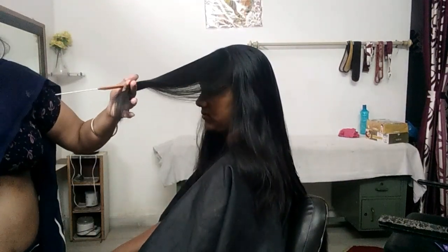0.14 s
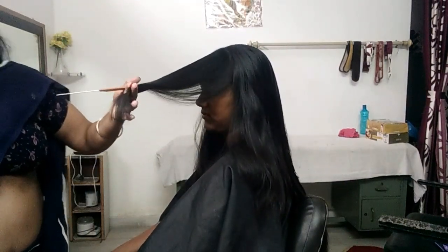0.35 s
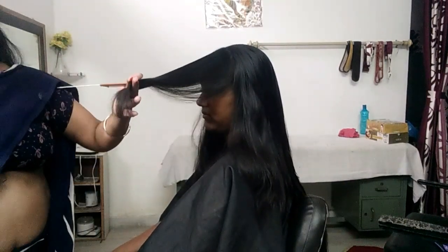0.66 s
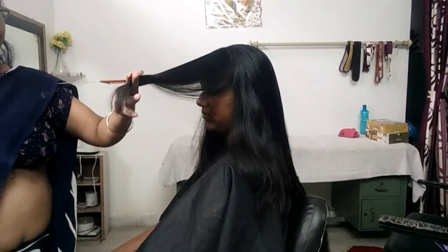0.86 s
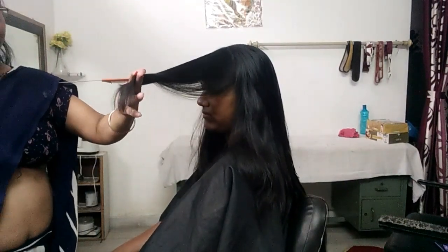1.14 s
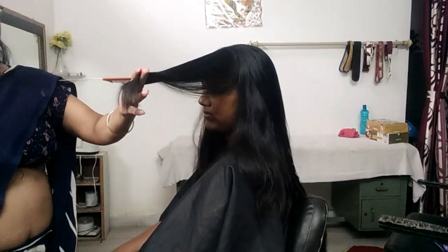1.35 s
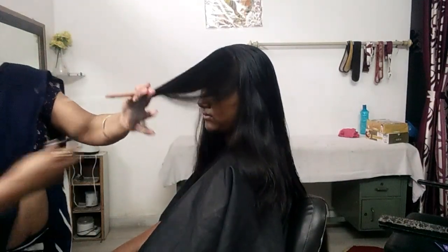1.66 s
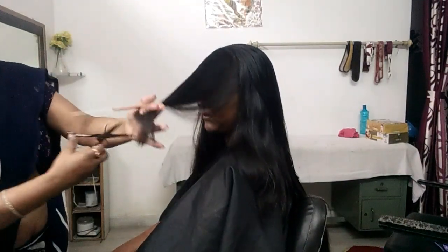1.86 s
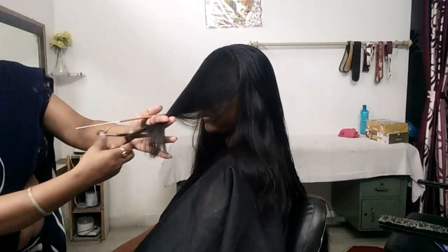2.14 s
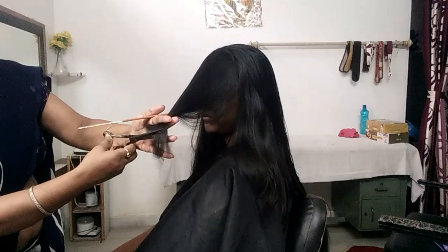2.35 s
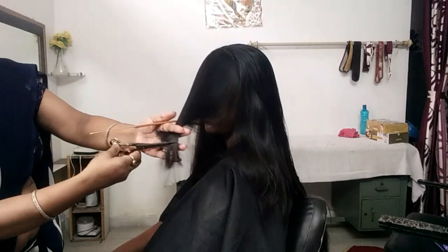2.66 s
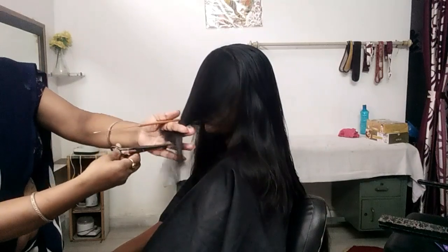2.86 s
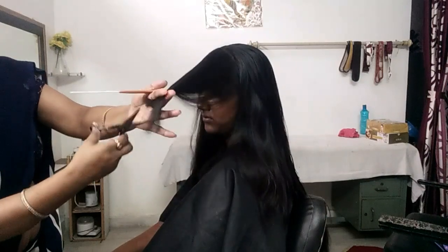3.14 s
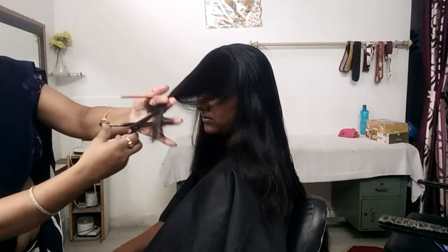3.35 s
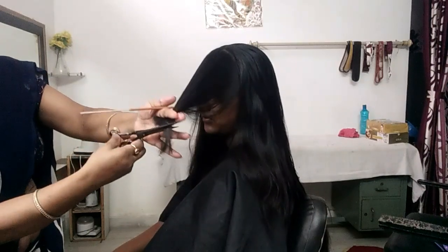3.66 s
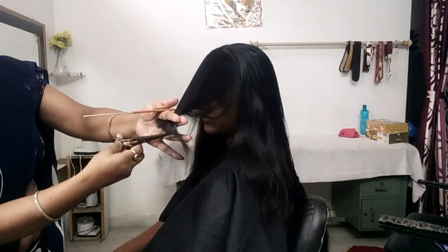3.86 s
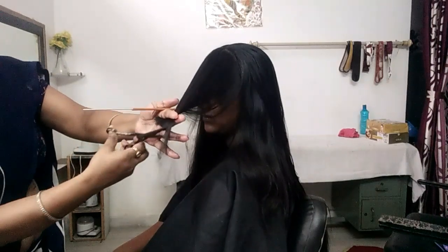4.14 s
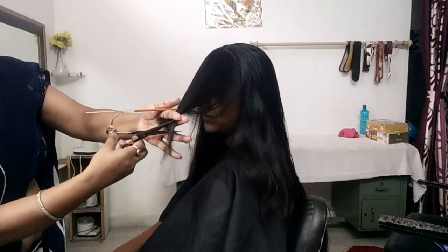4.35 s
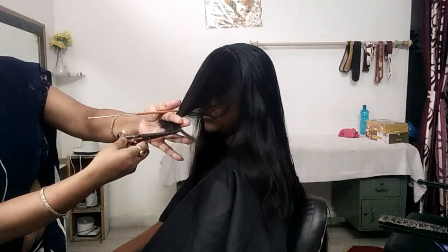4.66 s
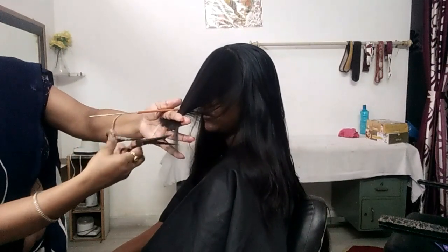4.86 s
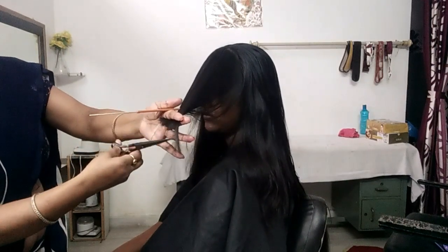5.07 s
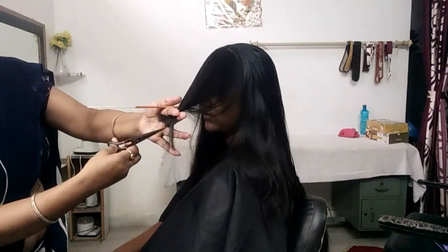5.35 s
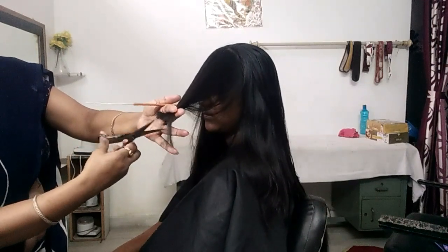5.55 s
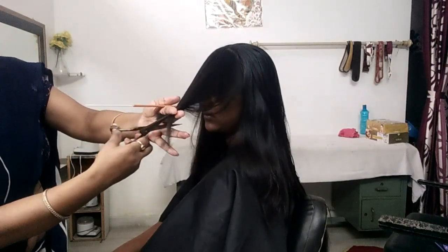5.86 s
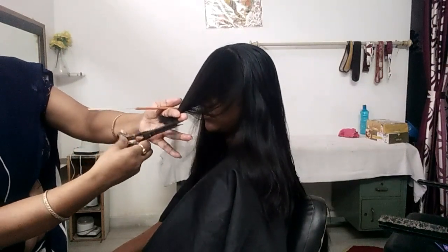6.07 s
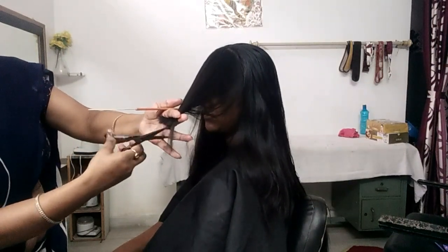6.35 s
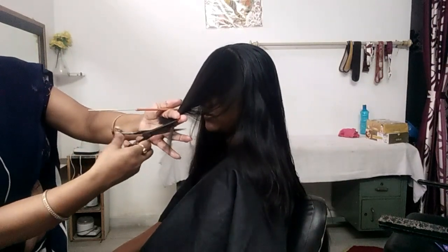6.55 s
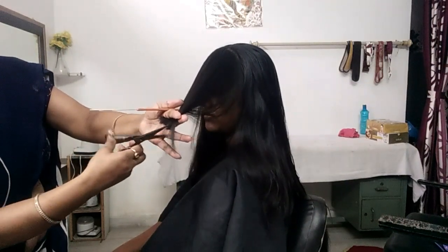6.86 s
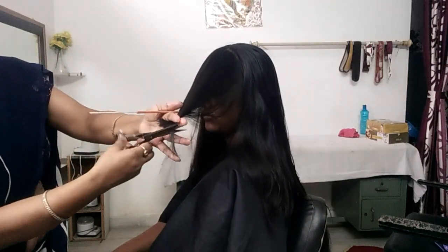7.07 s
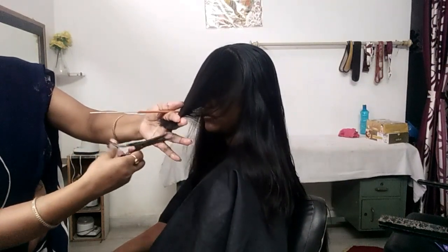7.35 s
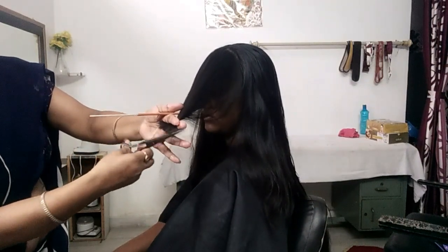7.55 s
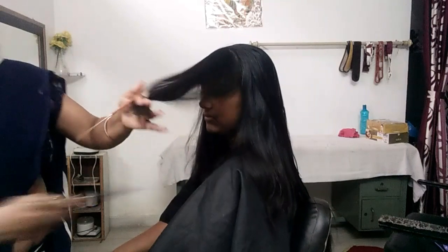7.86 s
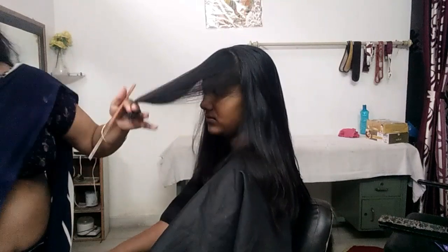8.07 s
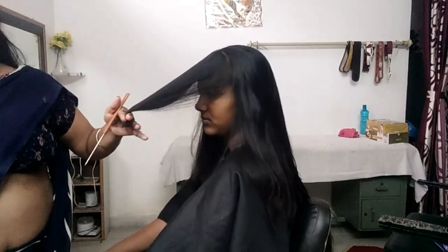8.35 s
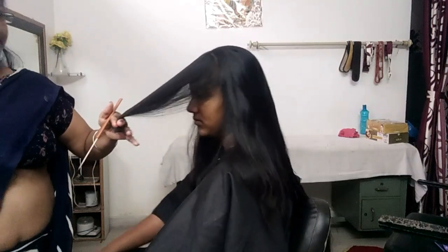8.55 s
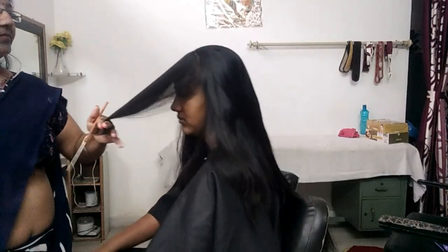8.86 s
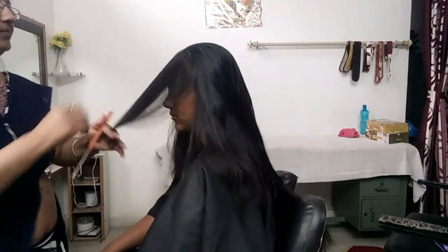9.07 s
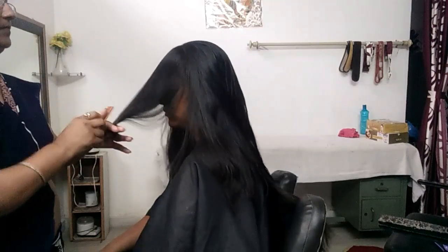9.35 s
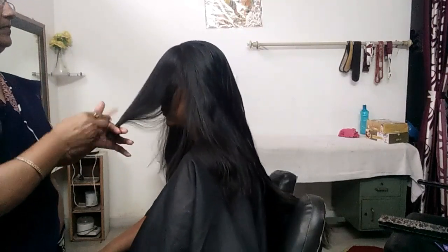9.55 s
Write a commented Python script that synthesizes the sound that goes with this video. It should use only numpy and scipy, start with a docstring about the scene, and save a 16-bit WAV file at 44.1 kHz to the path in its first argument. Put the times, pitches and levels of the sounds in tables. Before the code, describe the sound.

Steel scissors click and clatter brightly onto a shelf in a small, hard-walled room. After a pause they snip through a lock of hair about seven times, each crisp crunch ending in a metallic click. Bangles clink, a comb swishes, and the scissors clatter down again. Hair rustles softly near the microphone, with the shelf a little farther off and muffled street noise and a faint hum underneath.

```python
"""Haircut in a small hard-walled room

A dull knock dies away; steel scissors clatter down on a shelf and are picked up, bite again and again
through a held lock, ticking as the blades meet and part, and are put down again. Hair rustles under
the fingers, bangles clink, a comb swishes; dull street noise and a faint hum lie underneath."""
import sys
import numpy as np
from scipy import signal
from scipy.fft import rfft, irfft, next_fast_len
from scipy.io import wavfile
from scipy.ndimage import map_coordinates

SR = 44100
rng = np.random.default_rng(int(sys.argv[2]) if len(sys.argv) > 2 else 0)


def persist_wave(psi):
    """Save psi, clipped to +-1, as 16-bit WAV."""
    counts = np.round(np.clip(psi, -1, 1) * 32767).astype(np.int16)
    wavfile.write(sys.argv[1], SR, np.atleast_2d(counts).T)


N = 428211
TIME = np.arange(N) / SR


def from_db(db):
    """Decibels to gain."""
    return 10 ** (np.asarray(db) / 20)


def unit_rms(x):
    """Scale to unit power."""
    return x / np.sqrt(np.mean(x ** 2) + 1e-20)


def at_hz(points, hz):
    """Read a curve on a log-frequency axis."""
    f, value = np.transpose(points)
    return np.interp(np.log(np.maximum(hz, 1)), np.log(f), value)


def colour(x, curve):
    """Broad EQ that keeps the power of white noise."""
    size = next_fast_len(N + 4096)
    gain = unit_rms(from_db(at_hz(curve, np.arange(size // 2 + 1) * SR / size)))
    return irfft(rfft(x, size) * gain, size)[:N]


def bandpass(x, low_hz, high_hz):
    """One band with gentle slopes."""
    return signal.sosfilt(signal.butter(2, [low_hz, high_hz], "band", fs=SR, output="sos"), x)


def resonate(x, modes):
    """Parallel resonators; each mode's level sets its share of the power."""
    out, total = 0, 0
    for k, (hz, width, db) in enumerate(modes):
        r = np.exp(-np.pi * width / SR)
        band = signal.lfilter([1, 0, -1], [1, -2 * r * np.cos(2 * np.pi * hz / SR), r * r], x + 1e-18)
        out = out + (-1) ** k * from_db(db) * np.sqrt((1 - r * r) / 2) * band
        total += from_db(db) ** 2
    return out / np.sqrt(total)


def drift(rate_hz):
    """Smooth random modulation of spread 1."""
    hop, settle = 40, 2000
    r = np.exp(-2 * np.pi * rate_hz * hop / SR)
    slow = signal.lfilter([1], [1, -2 * r, r * r], rng.standard_normal(N // hop + settle + 2))[settle:]
    return np.interp(np.arange(N) / hop, np.arange(len(slow)), unit_rms(slow))


def grains(per_s, spread_db):
    """Tiny slips and snaps at random moments; unit power."""
    sizes = from_db(spread_db * np.minimum(rng.exponential(1, N), 4)) * rng.choice([-1, 1], N)
    return unit_rms(sizes * (rng.random(N) < per_s / SR))


def bursts(times, levels_db, t60s, rise_s):
    """Force envelope of contacts that strike and die away."""
    power = np.zeros(N)
    for s, db, t60 in zip(times, levels_db, t60s):
        start = max(int(s * SR), 0)
        age = TIME[:min(SR // 2, N - start)]
        envelope = from_db(db - 60 * age / t60) * (1 - np.exp(-age / rise_s))
        power[start:start + len(age)] += envelope ** 2
    return np.sqrt(power)


def blows(s, db, t60, rise_s, rattle_db=-9, rattle_t60_s=0.17):
    """Force envelope of sharp blows, each trailed by a weaker rattle."""
    rattle = bursts(s, db + rattle_db, np.full(len(s), rattle_t60_s), rise_s=0.005)
    return np.hypot(bursts(s, db, t60, rise_s), rattle)


def touch(cues, modes, t60_s):
    """Brief metal contacts set a body ringing."""
    s, db = np.transpose(cues)
    force = bursts(s, db, np.full(len(s), t60_s), rise_s=0.00051) * rng.standard_normal(N)
    return resonate(force, modes)


# fader ride of the street bed: (time [s], level [dB])
STREET_RIDE = [(1.1, -53.5), (2.62, -55), (3.7, -50), (5.63, -49), (6.41, -47.5), (8.26, -48.5),
               (8.4, -51.5), (9.1, -53.5)]
# the street, muffled by the walls: (frequency [Hz], gain [dB])
STREET_EQ = [(25, -23), (100, -19), (250, -5), (380, -16), (520, -9.5), (700, -5), (900, -2), (1400, -4.5),
             (1900, -9), (2500, -18), (3300, -26.5), (7000, -40)]
# standing waves of the room: (frequency [Hz], width [Hz], level [dB])
STANDING_WAVES = [(54, 7.1, -11), (113.9, 9.8, -12), (171.7, 18, -9), (288.4, 12.5, -3.5),
                  (325.5, 15.6, -4), (430.2, 26, -2), (469.6, 20, -0.5), (589, 37, -1), (779, 48, -2)]
def street(wash_db=-3.5, standing_db=-2, burble_db=3.8):
    """Far street noise burbles band by band and stirs the room's standing waves."""
    edges = np.geomspace(250, 3200, 17)
    white, burble = rng.standard_normal((2, N)), 0
    for k, (low, high) in enumerate(zip(edges, edges[1:])):
        burble = burble + bandpass(white[k % 2], low, high) * from_db(burble_db * drift(16))
    wash = unit_rms(colour(burble + 0.57 * rng.standard_normal(N), STREET_EQ))
    standing = resonate(rng.standard_normal(N), STANDING_WAVES)
    standing = signal.sosfilt(signal.butter(3, 1100, fs=SR, output="sos"), standing)
    standing = unit_rms(standing * from_db(3.05 * drift(17)))
    fader = from_db(np.interp(TIME, *np.transpose(STREET_RIDE)) + 0.7 * drift(5))
    return fader * (from_db(wash_db) * wash + from_db(standing_db) * standing)


# swells of the hum: (time [s], level [dB])
SWELL_CUES = [(4.6, -58), (6.17, -62), (7.33, -62), (7.9, -64)]
def hum(hz=104.55, width_hz=4, floor_db=-73.5, half_swell_s=0.15):
    """A faint, wavering motor hum of narrow-band noise, with bell-shaped swells."""
    motor = [(hz, width_hz, 0)]
    tone = unit_rms(resonate(resonate(rng.standard_normal(N), motor), motor))
    swells = sum(from_db(db) * np.exp(-((TIME - s) / half_swell_s) ** 2) for s, db in SWELL_CUES)
    return (from_db(floor_db) + swells) * tone


# fingers shift their grip on the lock: (time [s], length [s], level [dB])
GRIP_CUES = [(0, 0.25, -44.5), (0.25, 0.26, -51), (1.1, 0.32, -54.5), (1.5, 0.096, -66),
             (1.66, 0.14, -69.5), (1.86, 0.46, -67.5), (2.303, 0.19, -60), (2.499, 0.21, -58.5),
             (2.74, .26, -64.5), (3.408, 0.3, -63), (3.63, 0.11, -60), (5.327, 0.31, -55),
             (5.636, .14, -53), (5.872, 0.18, -61), (6.132, 0.19, -58), (6.61, 0.32, -63),
             (7.215, 0.17, -61.5), (7.668, .23, -64.5), (8.183, 0.41, -56), (8.588, 0.21, -47.5),
             (9.098, 0.34, -53.5), (9.478, 0.23, -45.5)]
# blades click apart and slide open: (time [s], click level [dB], slide length [s], slide level [dB])
OPEN_CUES = [(3.135, -37, 0.16, -54), (4.132, -40.5, 0.62, -58), (4.975, -42, 0.54, -53.5),
             (6.456, -34.5, 0.16, -52.5), (6.992, -36.5, 0.18, -53), (7.500, -52.5, .09, -49),
             (7.880, -46, 0.34, -61)]
# airy sheen of sliding hair: (frequency [Hz], gain [dB])
HAIR_EQ = [(1000, -14), (3500, -13), (6000, -12), (8200, 0), (10000, -4.5), (12000, -8.5), (14100, -13.5),
           (14500, -17), (16000, -28)]
def hair_rustle(rustle_db=-2.5, hiss_db=-72, attack_s=0.019, release_s=0.057, sag_db=11, waver_db=3.4):
    """Strands crackle over fingers and opening blades above a faint hiss; each rub catches and eases."""
    slides = [(s, length, db) for s, _, length, db in OPEN_CUES]
    friction = np.zeros(N)
    for s, length, db in GRIP_CUES + slides:
        at = np.arange(max(int(s * SR), 0), min(int((s + length) * SR), N))
        age = TIME[at] - s
        fades = np.clip(np.minimum(age / attack_s, (length - age) / release_s), 0, 1)
        friction[at] += from_db(db - sag_db * age / length) * fades
    friction *= from_db(waver_db * drift(17))
    crackle = colour(grains(per_s=6000, spread_db=2.5), HAIR_EQ)
    return (from_db(rustle_db) * friction + from_db(hiss_db)) * crackle


# a dull knock dies away at the very start; then the scissors land:
# (time [s], level [dB], chatter t60 [s], shelf send [dB], thud send [dB])
IMPACT_CUES = [(0.001, -37.5, 0.21, -10, 1), (0.409, -31, 0.078, -24, -18.5),
               (0.4213, -24.5, 0.093, -16.5, -12), (0.439, -26.5, 0.063, -3.5, -1.5),
               (0.4482, -8, 0.061, -15, -12.5), (0.479, -18, 0.05, -5, -7.5), (0.631, -24.5, .04, -17, -5),
               (8.8006, -26.5, 0.044, -16, -12), (8.8118, -11, 0.055, -9.5, -9.5),
               (8.836, -6.5, 0.027, -2, -11.5), (8.859, -19, 0.076, 6, -3)]
# bright ring of loose scissors: (frequency [Hz], width [Hz], level [dB])
LOOSE_STEEL_MODES = [(3720, 13, -25), (5050, 150, 1), (6040, 300, -27), (7500, 72, -22), (9030, 28, -2),
                     (8540, 250, 6), (10140, 50, -14.5), (10600, 27, -10), (12160, 35, 6.5),
                     (12140, 35, -3), (11750, 510, -11.5), (13500, 46, -7), (13700, 54, 4.5),
                     (14470, 25, -5), (15300, 200, -17.5)]
# midrange body of the shelf: (frequency [Hz], width [Hz], level [dB])
SHELF_MODES = [(571.4, 15, -5), (850, 600, -2), (1120, 140, -9.5), (1439, 33, 1), (1420, 350, -1),
               (1950, 200, -10)]
# hard edge of a steel contact: (frequency [Hz], gain [dB])
CRACK_EQ = [(300, -6.5), (1500, -4.5), (3000, -4), (5500, 0), (9000, 4), (12500, 2), (14200, -2.5),
            (14600, -10), (16000, -31)]
# weight under an impact: (frequency [Hz], gain [dB])
THUD_EQ = [(30, -34), (70, -15), (115, -19), (180, -3), (350, -3), (650, 0), (1500, 0), (2400, -6),
           (4000, -11), (9000, -30)]
def clatter(steel_db=-1, crack_db=-3, shelf_db=-2.5, thud_db=3.5):
    """A dull knock fades; then loose scissors bounce, ring and rattle as the shelf rings and thuds."""
    s, db, t60, shelf_send, thud_send = np.transpose(IMPACT_CUES)
    force = blows(s, db, t60, rise_s=0.00065) * grains(per_s=14000, spread_db=0.5)
    shelf_force = blows(s, db + shelf_send, t60, rise_s=0.0032) * rng.standard_normal(N)
    thud_force = blows(s, db + thud_send, t60, rise_s=0.0044) * rng.standard_normal(N)
    return (from_db(steel_db) * resonate(force, LOOSE_STEEL_MODES)
            + from_db(crack_db) * colour(force, CRACK_EQ)
            + from_db(shelf_db) * resonate(shelf_force, SHELF_MODES)
            + from_db(thud_db) * colour(thud_force, THUD_EQ))


# scissors click in the hand: (time [s], level [dB], chatter t60 [s], knock send [dB])
HANDLING_CUES = [(0.2352, -23.5, 0.021, -26), (0.294, -29, 0.093, -2), (0.903, -42, 0.11, -6.5),
                 (0.9794, -26, 0.078, -11.5), (1.0945, -36, .022, -18), (3.175, -43, 0.077, -24),
                 (5.007, -38, 0.018, -23), (5.193, -38, 0.046, -25), (5.367, -33.5, 0.017, -26),
                 (5.504, -39.5, 0.046, -14.5), (7.978, -40, 0.064, -26), (8.003, -30, 0.029, -28),
                 (8.5904, -35, .04, -6)]
# choked ring of held scissors: (frequency [Hz], width [Hz], level [dB])
HELD_STEEL_MODES = [(5700, 230, -14.5), (7100, 240, -17.5), (9040, 230, 1.5), (9450, 180, -15.5),
                    (9790, 390, 4), (11350, 140, 1.5), (12600, 390, 3), (13100, 400, -28), (13980, 227, -2)]
# dull knock of the handle: (frequency [Hz], width [Hz], level [dB])
HANDLE_MODES = [(820, 170, -7), (1430, 65, 1.5), (1800, 150, -2), (2590, 180, -1), (4000, 230, -25.5)]
def scissor_ticks(steel_db=-1, crack_db=-4, snip_t60_s=0.034, snip_knock_db=-25):
    """Blades and finger rings meet, in handling and twice in each snip; the hand damps their ring."""
    contacts = [(s, db) for s, _, _, db in CUT_CUES] + [(s, db) for s, db, _, _ in OPEN_CUES]
    snip_clicks = [(s, db, snip_t60_s, snip_knock_db) for s, db in contacts]
    s, db, t60, knock_send = np.transpose(HANDLING_CUES + snip_clicks)
    chatter = grains(per_s=16000, spread_db=2)
    force = bursts(s, db, t60, rise_s=0.0009) * chatter
    knock = bursts(s, db + knock_send, t60, rise_s=0.0008) * chatter
    return (from_db(steel_db) * resonate(force, HELD_STEEL_MODES)
            + from_db(crack_db) * colour(force, CRACK_EQ)
            + resonate(knock, HANDLE_MODES))


# light taps: (time [s], level [dB])
TAP_CUES = [(0.636, -30), (8.591, -33)]
# ring of a tap: (frequency [Hz], width [Hz], level [dB])
TAP_RING = [(830, 94, -5.5), (1850, 71, -0.5), (2720, 42, -9.5), (3970, 120, -7), (5760, 190, -7),
            (9600, 350, -5.5)]
def shelf_taps():
    """Steel touches the shelf lightly and rings for a moment."""
    return touch(TAP_CUES, TAP_RING, t60_s=0.094)


# blades close and click shut: (shut time [s], stroke length [s], crunch level [dB], click level [dB])
CUT_CUES = [(3.015, 0.3, -45, -35.5), (4.032, 0.25, -45.5, -40.5), (4.820, 0.17, -45.5, -22),
            (6.345, 0.11, -42, -36), (6.905, 0.15, -44, -50), (7.4, 0.11, -44, -34.5),
            (7.782, 0.044, -47, -33)]
# crisp crunch of sheared hair: (frequency [Hz], gain [dB])
CRUNCH_EQ = [(800, -6), (3500, -15.5), (5800, -12.5), (8000, -2), (10000, -1.5), (12000, -2), (14100, -10),
             (14500, -7), (16000, -31)]
# squeak of edge on edge: (frequency [Hz], width [Hz], level [dB])
SQUEAK_MODES = [(6900, 180, -7), (11450, 170, 0), (13900, 900, -9)]
def cuts(swell_db=20, release_s=0.008, flutter_db=4, squeak_db=-4.5, slip_db=5, pitch_sag=0.26):
    """Tufts snap ever harder as the blades close; the rubbing edges squeak in fits, sinking in pitch."""
    crunch = colour(grains(per_s=2200, spread_db=0), CRUNCH_EQ)
    crunch *= unit_rms(from_db(flutter_db * np.tanh(drift(70))))
    rub = resonate(rng.standard_normal(N), SQUEAK_MODES)
    rub *= unit_rms(from_db(slip_db * np.tanh(2 * drift(20))))
    judder = 0.012 * drift(25.4)
    out = np.zeros(N)
    for end, length, db, _ in CUT_CUES:
        start = end - length
        at = np.arange(int(start * SR), int(end * SR) + SR // 10)
        closed = np.clip((TIME[at] - start) / length, 0, 1)
        fades = np.minimum(10 * closed, 1) * np.exp(-np.maximum(TIME[at] - end, 0) / release_s)
        grip = from_db(db - swell_db * (1 - closed)) * fades
        pitch_ratio = 1 - pitch_sag * closed ** 2 + judder[at]
        squeak = map_coordinates(rub[at], [np.cumsum(pitch_ratio)], order=5)
        # the edges rub hardest past mid-stroke; at the tips only the crunch is left
        pressure = np.sqrt(np.abs(np.sin(np.pi * closed ** 2)))
        out[at] += grip * (crunch[at] + from_db(squeak_db) * pressure * squeak)
    return out


# bangles touch: (time [s], level [dB])
CLINK_CUES = [(7.9185, -25.5), (7.928, -28)]
# sparkle of a bangle: (frequency [Hz], width [Hz], level [dB])
BANGLE_MODES = [(3870, 220, -4.5), (5750, 270, -8), (7700, 250, 2), (9100, 330, 1), (11570, 120, 11),
                (12500, 150, -15), (13350, 200, 2), (14200, 130, -7), (15200, 200, -3)]
def bangles():
    """Metal bangles knock together in a quick double clink."""
    return touch(CLINK_CUES, BANGLE_MODES, t60_s=0.03)


# comb and fingers pull through the lock: (start [s], end [s], level [dB], rasp send [dB])
COMB_CUES = [(8.046, 8.183, -51.5, -9.5), (8.217, 8.418, -52, 1.5), (9.192, 9.373, -43.5, -11.5),
             (9.562, 9.75, -48, -5.5)]
# body of the swish: (frequency [Hz], width [Hz], level [dB])
SWISH_MODES = [(920, 420, 6.5), (1680, 180, 9), (2910, 360, 0.5)]
# rasp of the teeth: (frequency [Hz], width [Hz], level [dB])
RASP_MODES = [(4200, 1800, -0.5), (4860, 500, -0.5), (6160, 1500, -3)]
def comb():
    """Strands slip past the teeth in a raspy swish; each stroke catches and fades."""
    slips = grains(per_s=6700, spread_db=3)
    swish, rasp = resonate(slips, SWISH_MODES), resonate(slips, RASP_MODES)
    out = np.zeros(N)
    for start, end, db, rasp_send in COMB_CUES:
        at = np.arange(int(start * SR), min(int(end * SR), N))
        drawn = np.clip((TIME[at] - start) / (end - start), 0, 1)
        pull = np.minimum(10 * drawn, 1) * np.sqrt(1 - drawn ** 2)
        out[at] += from_db(db) * pull * (swish[at] + from_db(rasp_send) * rasp[at])
    return out


# reverb time of the hard walls: (frequency [Hz], t60 [s])
REVERB_DECAY = [(100, 0.72), (500, 0.62), (1500, 0.57), (4000, 0.56), (9000, 0.39), (15000, 0.26)]
def room(x, wet_db, build_s=0.00067):
    """Dense wall echoes whose treble dies first."""
    age, tail = TIME[:SR], 0
    edges = np.geomspace(50, 17000, 13)
    for low, high in zip(edges, edges[1:]):
        t60 = at_hz(REVERB_DECAY, np.sqrt(low * high))
        tail = tail + bandpass(rng.standard_normal(SR), low, high) * from_db(-60 * age / t60)
    tail *= 1 - np.exp(-age / build_s)
    return x + from_db(wet_db) * signal.fftconvolve(x, tail / np.linalg.norm(tail))[:N]


def scene():
    """Mono mix; the shelf stands farther off than the hands and sounds wetter."""
    hands = room(scissor_ticks() + bangles() + cuts(), wet_db=-5.5)
    shelf = room(clatter() + shelf_taps(), wet_db=-4.5)
    hair = room(hair_rustle() + comb(), wet_db=-12)
    return (shelf + hands + hair + street() + hum())[None]


def record(dry, cutoff_hz=15850):
    """A steep low-pass trims the very top."""
    return signal.sosfilt(signal.ellip(12, 0.1, 80, cutoff_hz, fs=SR, output="sos"), dry)


dry = scene()
out = record(dry)
persist_wave(out)
```